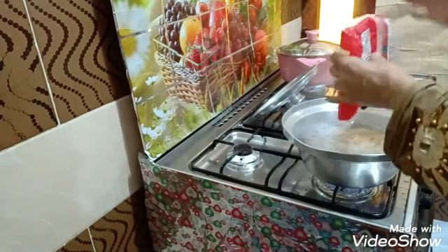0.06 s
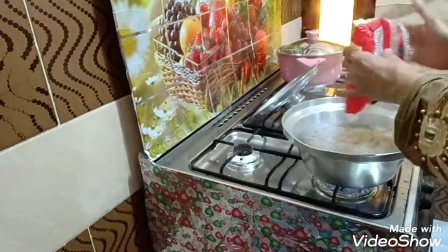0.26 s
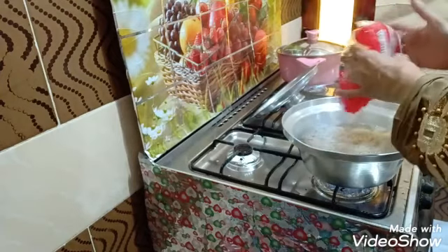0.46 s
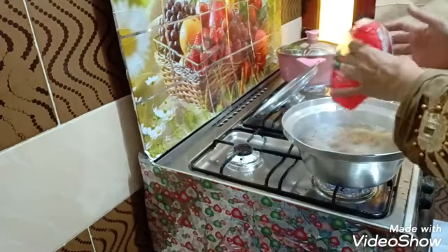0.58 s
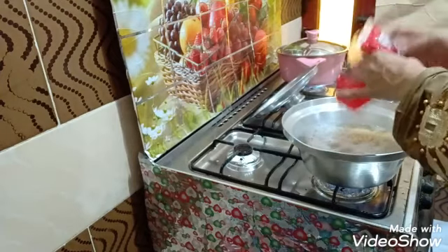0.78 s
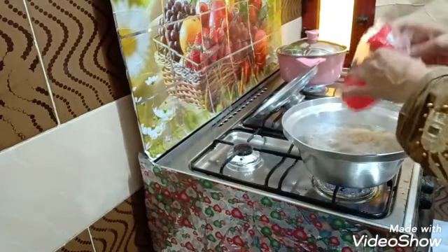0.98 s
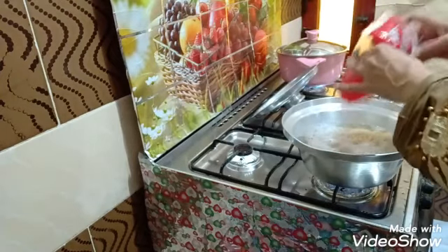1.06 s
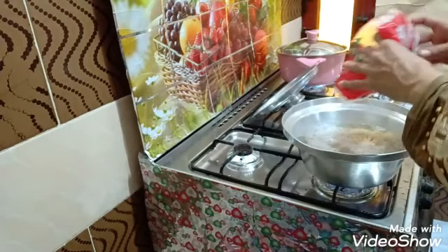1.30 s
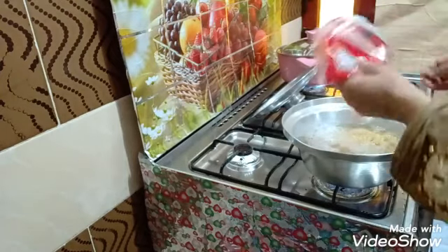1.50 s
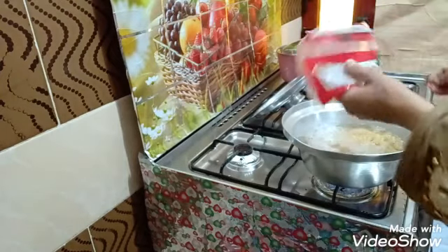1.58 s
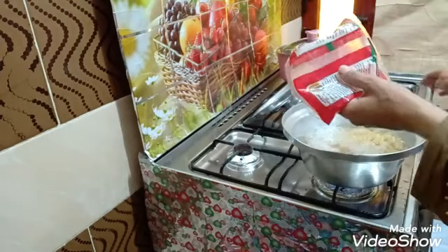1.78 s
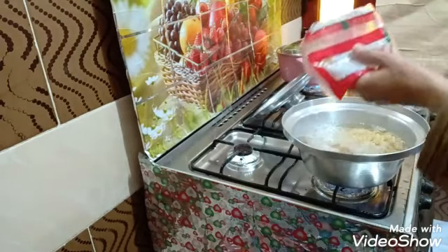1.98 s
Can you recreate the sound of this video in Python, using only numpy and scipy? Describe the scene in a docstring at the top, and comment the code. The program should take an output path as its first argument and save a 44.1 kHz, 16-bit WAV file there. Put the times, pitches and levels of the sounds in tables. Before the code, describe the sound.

A crinkly plastic packet of dry pasta shaken into a metal pot over a soft hum.

```python
"""In a tiled kitchen, a plastic packet of dry pasta is shaken out over a pot on a gas stove.
Each shake rattles the pasta against the packet and spills some into the pot, which rings faintly.
The plastic crackles and snaps, and the shakes weaken as it empties. Then the packet slides with
a falling swish. An electric hum and the soft rush of the burner run underneath."""
import sys
import numpy as np
from scipy import signal
from scipy.fft import rfft, irfft, next_fast_len
from scipy.io import wavfile
from scipy.ndimage import uniform_filter1d

SR = 44100
rng = np.random.default_rng(int(sys.argv[2]) if len(sys.argv) > 2 else 0)


def file_out(sig):
    """Save sig as 16-bit WAV at sys.argv[1]."""
    # one column per channel
    cols = np.atleast_2d(sig).T
    # limit, then scale
    lim = np.clip(cols, -1, 1)
    pcm = np.round(lim * 32767).astype(np.int16)
    wavfile.write(sys.argv[1], SR, pcm)


N = 90404
PADDED = next_fast_len(N + SR)  # extra samples for the echoes to die away
LEFT_LAG_S = 0.00021  # the packet is to the right, so the left side hears it later

# shakes of the packet: (time [s], rise [s], rattle level [dB], rattle fade [s], thump level [dB],
# spill level [dB], knock pitch [Hz], relative knock level [dB])
SHAKES = [(.238, 0.0072, -21, 0.029, -27, -31, 264, -28), (.423, 0.023, -23, 0.02, -36, -31.5, 286, -36.5),
          (.56, 0.015, -24, .012, -30.5, -32.5, 258, -35.5),
          (0.702, 0.0094, -23, 0.029, -37, -34.5, 195, -36.5),
          (.865, 0.02, -29, 0.0087, -38, -59, 280, -41),
          (1.003, 0.0078, -35.5, 0.0077, -39.5, -50, 261, -43),
          (1.044, .018, -30, 0.026, -61, -48, 307, -48), (1.383, 0.014, -31, 0.0066, -37.5, -54, 573, -41)]


def amp(db):
    """Turns decibels into a number to multiply a sound by."""
    return 10 ** (np.asarray(db) / 20)


def unit(x):
    """Scales a sound to an average power of 1."""
    return x / np.sqrt(np.mean(x ** 2) + 1e-20)


def read(points, hz):
    """Looks up a frequency in a table, blending between rows along a musical pitch scale."""
    freqs, values = np.transpose(points)
    return np.interp(np.log(hz + 1), np.log(freqs + 1), values)


def colour(x, points, size=4096):
    """Gives a sound the tone in a table, using a filter with a total energy of 1."""
    log_gain = np.log(amp(read(points, abs(np.fft.fftfreq(size, 1 / SR)))))
    response = np.exp(np.conj(signal.hilbert(log_gain)))  # rings after a hit, never before
    taps = np.fft.ifft(response).real[:size // 2]
    return signal.fftconvolve(x, taps / np.linalg.norm(taps))[:N]


def grains(per_s, spread_db):
    """Tiny random hits of uneven size, their power evened out over about a hundredth of a second."""
    hits = (rng.random(N) < per_s / SR) * rng.choice([-1, 1], N)
    hits = hits * amp(spread_db * np.minimum(rng.exponential(1, N), 4))
    local_power = abs(uniform_filter1d(hits ** 2, size=500))
    return hits / np.sqrt(local_power + np.mean(hits ** 2) / 20)


def burst(peak_s, rise_s, fade_s):
    """A loudness curve that swells to its peak, then dies away."""
    t = np.arange(N) / SR - peak_s
    return np.exp(-np.where(t < 0, (t / rise_s) ** 2, t / fade_s))


def pair(spectra, likeness, hz):
    """Blends two noises into left and right: likeness 1 is the same, 0 unrelated, -1 opposite."""
    alike = np.clip(read(likeness, hz), -1, 1)
    return np.array([spectra[0], alike * spectra[0] + np.sqrt(1 - alike ** 2) * spectra[1]])


def hum():
    """Mains electricity hums and throbs, and flutters as weaker tones drift in and out of step."""
    # weaker tones: (pitch [Hz], level [dB], time when in step with the hum [s])
    weak_tones = [(86, -54.5, .078), (106.5, -63, .07)]
    mains_hz, mains_db = 100.15, -45.7
    throb_per_s, dip_s, depth = 6.36, .467, .36
    overtone_hz, overtone_db = 172, -66
    t = np.arange(N) / SR
    cycles = mains_hz * t + rng.random()
    throb = 1 - depth * np.cos(2 * np.pi * throb_per_s * (t - dip_s))
    mains = amp(mains_db) * throb * np.sin(2 * np.pi * cycles)
    flutter = sum(amp(db) * np.sin(2 * np.pi * (cycles + (hz - mains_hz) * (t - s)))
                  for hz, db, s in weak_tones)
    overtone = amp(overtone_db) * unit(np.sin(2 * np.pi * (overtone_hz * t + rng.random())))
    return np.sqrt(2) * (mains + flutter) + overtone


def burner():
    """The gas flame makes a soft, low, steady rush."""
    # tone of the flame: (frequency [Hz], relative level [dB])
    tone = [(20, -14), (50, -4), (70, 0), (100, 6), (135, 2), (200, -7.5), (400, -10.5), (1000, -9),
            (1600, -12.5), (2500, -9), (4000, -30), (6300, -16.5), (7800, -20.5), (9500, -89), (15000, -58)]
    # how alike the flame sounds left and right: (frequency [Hz], likeness [-1 to 1])
    likeness = [(25, .3), (60, 0.6), (100, 0.81), (200, 1), (600, 0.2), (1500, .1), (6000, 0.1)]
    hz = np.fft.rfftfreq(N, 1 / SR)
    noise = pair(rfft(rng.standard_normal((2, N))), likeness, hz)
    return amp(-53.5) * unit(irfft(noise * amp(read(tone, hz)), N))


def echoes(hz):
    """One set of echoes, as spectra: quick bounces off the stove and tiles, then a fading tail."""
    # how long the kitchen rings: (frequency [Hz], time to fade by 60 dB [s])
    ring_times = [(100, 0.24), (500, 0.33), (2500, 0.41), (6000, 0.38), (12000, 0.12)]
    # how alike the echoes are left and right: (frequency [Hz], likeness [-1 to 1])
    likeness = [(60, 0.21), (150, 0.11), (300, 0.87), (600, 0.61), (1200, -0.4), (2500, 0.0054),
                (6000, 0.025)]
    build_s, early_db, early_fade_s = 0.00095, 6, 0.0039
    bands, t, noise = signal.stft(rng.standard_normal((2, SR // 2)), SR, nperseg=256)
    fade = amp(-60 * t / read(ring_times, bands)[:, None])
    tail = signal.istft(noise * fade, SR, nperseg=256)[1]
    t = np.arange(tail.shape[1]) / SR
    tail *= (1 - np.exp(-t / build_s)) * (1 + amp(early_db) * np.exp(-t / early_fade_s))
    tail /= np.linalg.norm(tail, axis=1, keepdims=True)
    return pair(rfft(tail, PADDED), likeness, hz)


def kitchen(x, echo_sets=8):
    """Direct sound plus echoes. Pieces land in different spots, so sets of echoes take turns."""
    direct_db, room_db, rounds_per_s = -5.5, 1, 23
    t, hz = np.arange(N) / SR, np.fft.rfftfreq(PADDED, 1 / SR)
    shares = np.array([np.exp(echo_sets * np.cos(2 * np.pi * (rounds_per_s * t + k / echo_sets)))
                       for k in range(echo_sets)])
    shares /= np.linalg.norm(shares, axis=0)
    room = sum(rfft(x * share, PADDED) * echoes(hz) for share in shares)
    direct = rfft(x, PADDED) * np.exp(-2j * np.pi * hz * np.array([[LEFT_LAG_S], [0]]))
    return irfft(amp(direct_db) * direct + amp(room_db) * room, PADDED)[:, :N]


def pot(hits):
    """The metal pot rings faintly with whatever strikes it."""
    # notes of the pot: (pitch [Hz], relative level [dB], time to fade by 60 dB [s])
    notes = [(266, -7, .25), (586, -6, .24), (658, -3.5, .2), (737, -1, .22), (830, -8, .3),
             (1034, -3, .25), (1141, -3.5, .24), (1332, -6.5, .25), (1813, -5, .25), (2102, -5, .25),
             (2289, -5, .25), (2741, -8.5, .25), (2788, -8, .25), (3104, -6, .2)]
    spread_hz = 1210  # above this, left and right can be out of step by any amount
    t = np.arange(SR // 2) / SR
    ring = np.zeros((2, len(t)))
    for hz, db, ring_s in notes:
        offset = rng.random((2, 1)) * min(hz / spread_hz, 1)
        ring += amp(db - 60 * t / ring_s) * np.sin(2 * np.pi * (hz * t + offset))
    ring /= np.linalg.norm(ring[0])
    return amp(-14.5) * signal.fftconvolve(hits[None], ring, axes=1)[:, :N]


def slide():
    """The sliding plastic scrapes, with a swish that falls in pitch as it slows."""
    # course of the slide: (time [s], swish pitch [Hz], swish level [dB], scrape level [dB])
    course = [(1.825, 7400, -66, -68), (1.851, 5340, -51, -60), (1.866, 4570, -45.5, -54),
              (1.885, 4020, -45.5, -46), (1.905, 3930, -43.5, -48.5), (1.92, 3300, -45.5, -45),
              (1.949, 2770, -47.5, -57), (1.98, 2850, -67, -54), (2.02, 2850, -53, -64),
              (2.05, 2700, -62, -64)]
    # tone of the scrape: (frequency [Hz], relative level [dB])
    tone = [(300, -43), (900, -13), (1300, 3.5), (1800, -7), (2400, -3), (3200, 3), (4100, 5), (5200, -2),
            (6300, -3), (8000, -16), (10000, -49), (15000, -49)]
    width_hz = 660  # a wider band of pitches sounds less like a whistle
    s, hz, swish_db, scrape_db = np.transpose(course)
    t = np.arange(N) / SR
    glide = np.exp(2j * np.pi * np.cumsum(np.interp(t, s, hz)) / SR)
    decay = np.exp(-np.pi * width_hz / SR)
    # dividing by the glide, smoothing and multiplying back keeps the sound near the gliding pitch
    smoothed = signal.lfilter([1], [1, -2 * decay, decay ** 2], grains(5000, spread_db=3.5) / glide)
    swish = amp(np.interp(t, s, swish_db)) * unit((glide * smoothed).real)
    scrape = amp(np.interp(t, s, scrape_db)) * colour(grains(2300, spread_db=3), tone)
    return (t > s[0]) * (swish + scrape)


def rustle():
    """Loose pasta and plastic crackle as the hands move the packet."""
    # loudness of the handling: (time [s], level [dB])
    handling = [(0, -37), (.06, -47.5), (.11, -52), (.145, -44.5), (.18, -49), (.209, -38), (.36, -64),
                (.52, -45.5), (.66, -46), (.84, -39), (.96, -39), (1.09, -50.5), (1.14, -44.5),
                (1.189, -44), (1.305, -49), (1.335, -37), (1.415, -41), (1.47, -56.5), (1.6, -59.5),
                (1.67, -62), (2.05, -57.5)]
    # tone of the rustle: (frequency [Hz], relative level [dB])
    tone = [(100, -33), (280, -5), (450, -1), (650, -2), (900, -3.5), (1200, 3), (1600, -3), (2500, 2.5),
            (4000, -7.5), (6200, -9.5), (6700, -7.5), (7800, -16), (9500, -31), (12000, -38), (15500, -76)]
    level = amp(np.interp(np.arange(N) / SR, *np.transpose(handling)))
    return colour(level * grains(per_s=1300, spread_db=4.5), tone)


def creases():
    """The plastic buckles in short crunches, each gathered around its own pitch."""
    # single creases: (time [s], relative level [dB], centre pitch [Hz], fade [s])
    crunches = [(.001, -41.5, 2140, 0.0034), (.119, -49, 6300, .004), (.207, -37, 2000, .006),
                (.238, -25, 6400, 0.0038), (.247, -34, 6430, 0.0036), (.254, -29.5, 2060, 0.0015),
                (.285, -26.5, 2600, 0.0026), (.406, -35.5, 3200, 0.0028), (.429, -38, 4250, 0.0018),
                (.556, -35, 5100, 0.0089), (.713, -26.5, 5260, 0.0011), (.729, -38, 2430, 0.0011),
                (.77, -34, 1410, 0.00085), (.918, -40.5, 4440, .0015), (1.002, -37, 1100, 0.0028),
                (1.028, -34, 5500, .00075), (1.041, -36.5, 5900, 0.00084), (1.096, -44, 5500, 0.0015),
                (1.176, -44, 6060, .002), (1.320, -44, 6840, 0.004), (1.687, -42.5, 3460, 0.00059),
                (1.696, -47.5, 2510, 0.0098), (2.002, -48, 2400, .0015)]
    width_octaves, boost_db = 0.39, 7
    out, hz = np.zeros(N), np.geomspace(50, SR / 2, num=60)
    for s, db, centre, fade in crunches:
        hump_db = -18 * np.log10(1 + (np.log2(hz / centre) / width_octaves) ** 2)
        treble_cut_db = 55 * np.log2(np.maximum(hz / 6500, 1))
        crunch = rng.standard_normal(N) * burst(s, rise_s=.0005, fade_s=fade)
        out += amp(db + boost_db) * colour(crunch, np.c_[hz, hump_db - treble_cut_db])
    return out


def snaps():
    """Tight plastic pops with a very short click, which bounces straight back off the stove top."""
    # snaps of the packet: (time [s], level [dB], pitch [Hz])
    pops = [(.123, -25, 2100), (.143, -26, 2500), (.197, -24, 2200), (0.266, -19, 2450),
            (0.4062, -18, 2560), (0.415, -20, 2750), (.628, -12.5, 2100), (.710, -11.5, 2000),
            (0.7156, -19, 2640), (.799, -27, 2270), (0.841, -24, 2600), (.863, -15, 1950),
            (1.0293, -17, 2560), (1.042, -17.5, 3000), (1.177, -23, 2250), (1.278, -25, 2550),
            (1.322, -27, 2110), (1.349, -25, 2410), (1.3847, -16, 2010), (1.58, -44, 1540),
            (1.585, -42, 2020), (1.687, -34.5, 3200), (1.689, -26, 2730)]
    fade_cycles, echo_s, echo_db = .62, .0018, -15
    t = np.arange(N) / SR
    out = np.zeros(N)
    for s, db, hz in pops:
        for delay, gain in ((0, 1), (echo_s, amp(echo_db))):
            cycles = (t - s - delay) * hz
            out += gain * amp(db) * np.exp(-(cycles / fade_cycles) ** 2) * np.sin(2 * np.pi * cycles)
    return out


def knocks():
    """The weight of the pasta gives the packet one dull knock per shake."""
    t = np.arange(N) / SR
    return sum(amp(db) * burst(s, rise_s=0.004, fade_s=0.016) * np.sin(2 * np.pi * hz * (t - s))
               for s, *_, hz, db in SHAKES)


def shakes():
    """Each shake rattles the pasta, thumps the packet and spills some pieces into the pot."""
    # bright tone of the rattling pasta: (frequency [Hz], relative level [dB])
    rattle_tone = [(100, -38), (300, -14.5), (700, -3.5), (1500, -1), (2500, 1.5), (3900, -4), (5200, -8),
                   (6250, -1), (6600, -8.5), (7900, -13), (10000, -26), (12000, -30.5), (15500, -34)]
    # dull tone of the thumped packet: (frequency [Hz], relative level [dB])
    thump_tone = [(40, -38), (170, -15), (280, -6.5), (370, -5.5), (480, 1.5), (590, -1), (730, 4.5),
                  (900, -8.5), (1250, -4), (2200, -28), (5000, -12), (15000, -84)]
    # tone of pasta landing in the pot: (frequency [Hz], relative level [dB])
    spill_tone = [(100, -20), (280, -6.5), (620, -3.5), (900, -11.5), (1150, 2), (1600, -7), (2400, -1),
                  (3000, -6), (4200, -15.5), (6200, -15.5), (7800, -16.5), (10000, -30.5), (15500, -32.5)]
    spill_delay_s = 0.038
    rattle, thump, spill = np.zeros((3, N))
    for s, rise, rattle_db, fade, thump_db, spill_db, *_ in SHAKES:
        rattle += amp(rattle_db) * burst(s, rise, fade)
        thump += amp(thump_db) * burst(s, rise, fade_s=0.0086)
        spill += amp(spill_db) * burst(s + spill_delay_s, rise_s=0.035, fade_s=0.059)
    return (colour(rattle * grains(per_s=3000, spread_db=5.5), rattle_tone)
            + colour(thump * grains(per_s=1300, spread_db=7), thump_tone)
            + colour(spill * grains(per_s=2200, spread_db=4), spill_tone))


def scene():
    """Mixes the packet, pasta and pot in the kitchen, over the hum and the burner."""
    pasta, clicks = shakes() + rustle(), snaps()
    left_clicks = np.interp(np.arange(N) - LEFT_LAG_S * SR, np.arange(N), clicks)
    close_clicks = np.array([left_clicks, clicks])
    room = kitchen(pasta + creases() + slide() + amp(-4) * clicks)
    return room + close_clicks + amp(-2.5) * knocks() + pot(pasta) + hum() + burner()


def record(dry):
    """Leans some pitches left and others right, then cuts off the very highest treble."""
    # left-right balance: (frequency [Hz], left minus right level [dB])
    balance = [(100, -0.5), (1200, -1), (4000, 0), (6000, -2.5), (7000, 0.5), (8500, 5), (15000, 1.5)]
    lean_db = read(balance, np.fft.rfftfreq(PADDED, 1 / SR)) / 2
    stereo = irfft(rfft(dry, PADDED) * amp([lean_db, -lean_db]), PADDED)[:, :N]
    treble_cut = signal.firwin(511, cutoff=15750, window=("kaiser", 9), fs=SR)
    return signal.oaconvolve(stereo, treble_cut[None], "same")


dry = scene()
out = record(dry)
file_out(out)
```